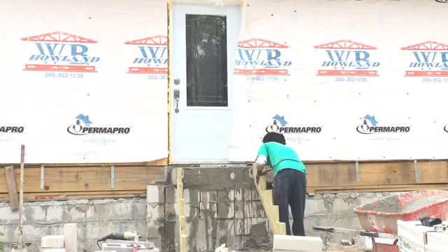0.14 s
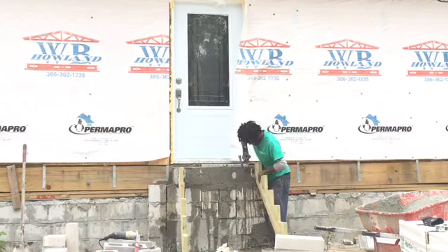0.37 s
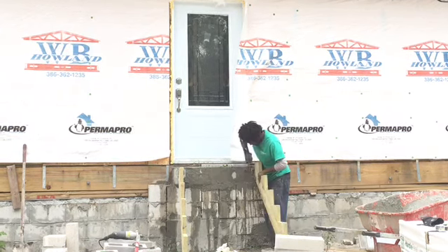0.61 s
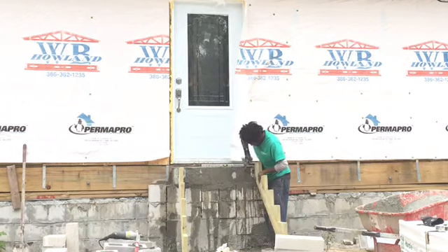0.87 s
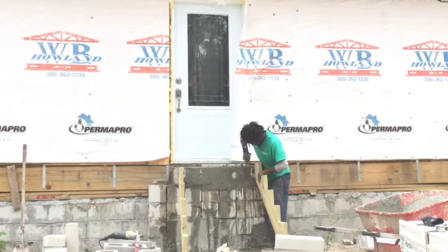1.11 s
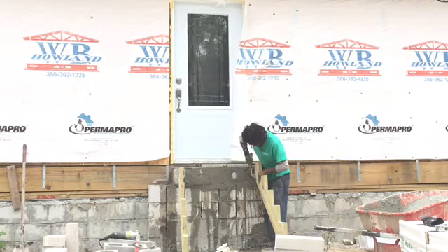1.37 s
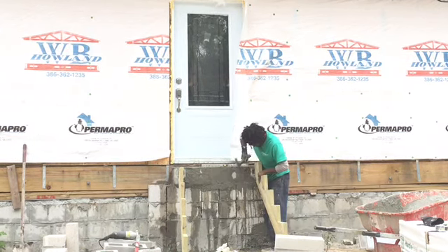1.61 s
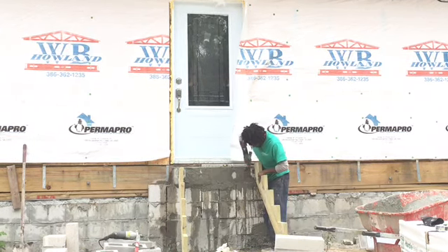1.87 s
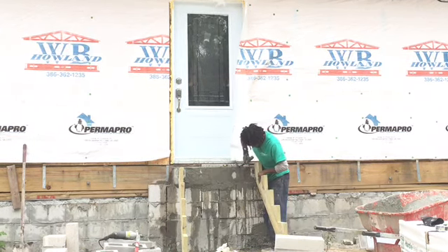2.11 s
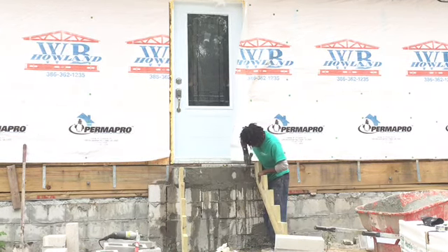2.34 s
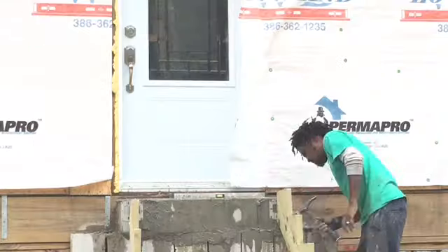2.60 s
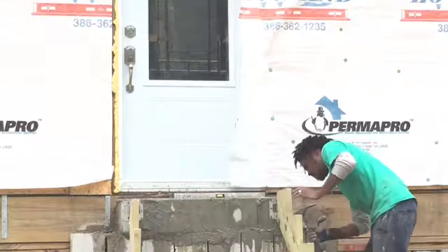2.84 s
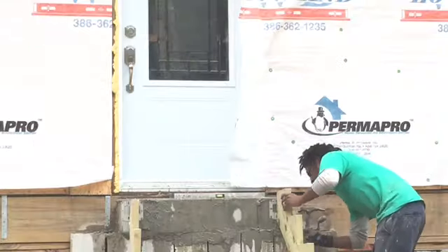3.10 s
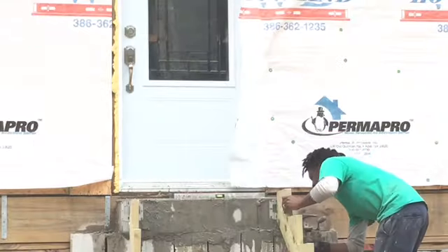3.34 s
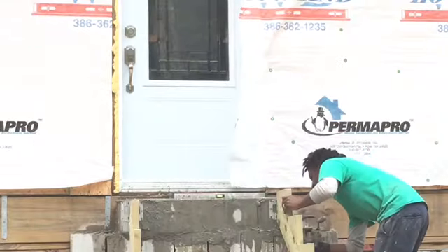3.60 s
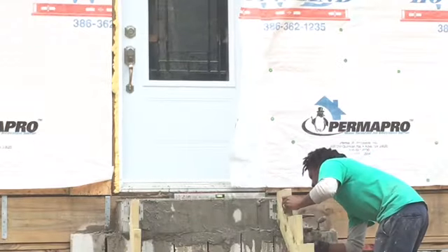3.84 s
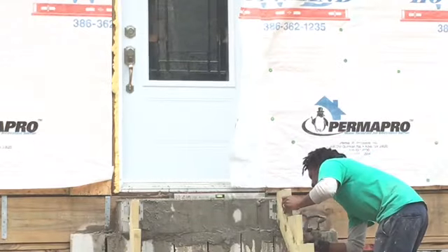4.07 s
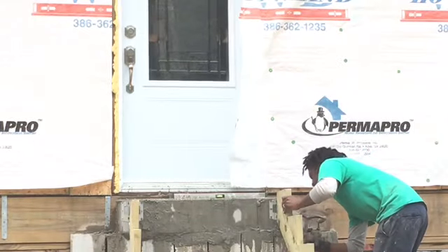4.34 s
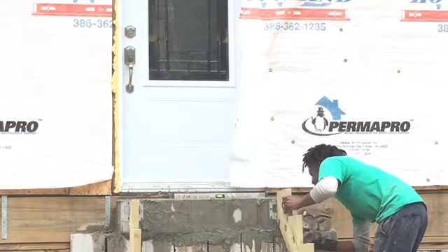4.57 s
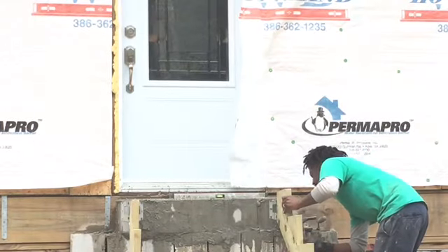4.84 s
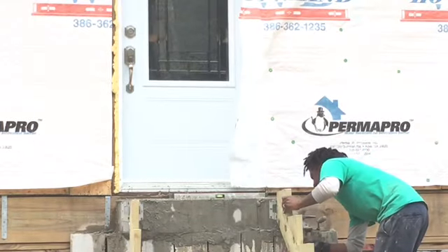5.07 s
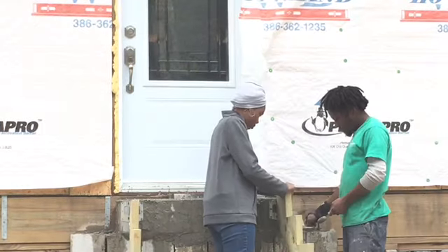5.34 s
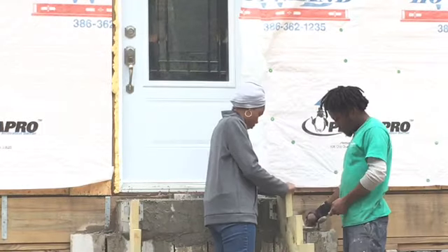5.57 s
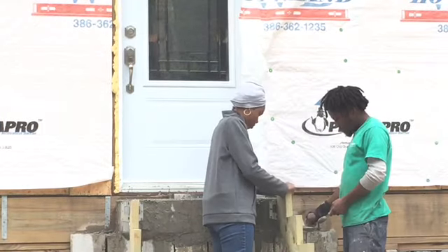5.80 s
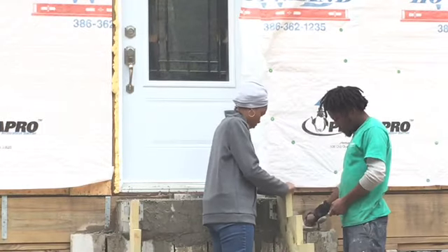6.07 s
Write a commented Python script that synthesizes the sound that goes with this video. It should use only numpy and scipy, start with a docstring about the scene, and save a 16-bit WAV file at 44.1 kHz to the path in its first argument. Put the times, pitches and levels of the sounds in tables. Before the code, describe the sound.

Outdoors at a building site, a hammer drives nails into a wooden stair board some metres from the microphone. Sharp cracks with woody knocks and thin nail rings come about every half second or less, each with quick wall echoes and a soft distant wash. After a pause, a faster run sounds louder and more hollow, with tiny tool ticks, a soft low bump and faint rustle. It stops, leaving low traffic hum.

```python
"""A hammer drives nails into a wooden stair stringer beside a house wall, heard from some metres off outdoors.
From the start each blow is a noisy crack, a short nail ring and a set of board modes; ground, wall and
stacks throw sharp echoes, and far buildings and trees a soft late wash. Shaped noise hums below as traffic.
The scene changes three times, with a fade out and in. After the second change the blows sound different,
tools tick in noise puffs, one low bump rings and a faint treble rustle grows until the last change."""
import sys
import numpy as np
from scipy import signal
from scipy.fft import rfft, irfft
from scipy.io import wavfile

SR = 44100
rng = np.random.default_rng(int(sys.argv[2]) if len(sys.argv) > 2 else 0)


def waveform_to_disk(signal):
    """Save audio, clipped to [-1, 1], as 16-bit WAV at the path in sys.argv[1]."""
    frames = np.transpose(np.atleast_2d(signal))
    scaled = np.clip(frames, -1, 1) * 32767
    samples = np.round(scaled).astype(np.int16)
    wavfile.write(sys.argv[1], SR, samples)


def linear_from_db(decibels):
    """Turn decibels (scalar or array-like) into linear amplitude factors; 0 gives 1."""
    return 10 ** (np.asarray(decibels, float) / 20)


N = 272971   # length of the sound [samples]
TAIL = int(0.6 * SR)   # longest echo [samples]

# changes of scene: (earlier echoes end [s], fade out starts [s], silence [s], fade in ends [s])
SCENE_CHANGES = [(.44, .455, .498, .535), (2.765, 2.73, 2.765, 2.81), (5.339, 5.365, 5.402, 5.43)]


def ring(push, hz, t60):
    """A resonance: a unit click sets off a sine of height 1 that falls 60 dB in t60 seconds."""
    radius = linear_from_db(-60 / (t60 * SR))
    turn = 2 * np.pi * hz / SR   # angle per sample
    # the tiny offset keeps the filter away from extremely small numbers
    return signal.lfilter([0, np.sin(turn)], [1, -2 * radius * np.cos(turn), radius ** 2], push + 1e-18)


def blow(board_db, crack_db, nail_hz, nail_db, second, lead_s):
    """One strike sets crack, nail and board sounding; the hard contact comes lead_s after the start."""
    # board modes: (pitch [Hz], time to fall 60 dB [s],
    #               level over the board level at the first spot [dB], the same at the second spot [dB])
    board_modes = [(60.7, 0.35, -9, -18), (130.8, 0.23, -11, -14), (221.1, 0.14, 1, -2),
                   (337.4, 0.087, 4.5, 2), (418.3, 0.07, 2, 3.5), (500.3, 0.056, 6, 3.5),
                   (551.6, 0.06, 4, 3.5), (628.3, 0.15, -2.5, -1), (693, 0.11, -1.5, -6.5),
                   (778, 0.029, 2, 6), (862, 0.078, 3.5, 2), (1039, 0.089, -2.5, 1),
                   (1235, 0.04, -0.5, 0.5), (1336, 0.081, -6.5, -1), (1537, 0.019, -1, -2),
                   (1643, 0.037, 0, -1.5), (1863, 0.0077, 2, 5), (2507, 0.01, -6.5, -45)]
    # the board yields this long before the hard contact: [first spot [s], second spot [s]]
    board_early_s = [0.00114, 0.002093]
    # loudest mode over the board level of a usual blow: [first spot [dB], second spot [dB]]
    loud_over_board_db = [-1, 8.5]
    crack_low_hz, crack_top_hz = 1200, [8350, 2990][second]
    uneven_db, detune = 2.8, 0.012   # detune is a fraction of the pitch
    loud_hz, loud_split_hz, loud_t60_s = 968, 33, 0.08
    usual_board_db = [-26, -18.5][second]
    loud_follows = 1.1   # dB per dB of board level: firmer blows favour the loudest mode

    t = np.arange(int(0.25 * SR)) / SR - lead_s
    click, push = np.zeros((2, len(t)))
    click[int(lead_s * SR)] = 1
    push[int((lead_s - board_early_s[second]) * SR)] = 1

    # faint noise rises just before the contact
    lead_noise = np.where(t < 0, linear_from_db(-27 + 2500 * t), 0) * rng.standard_normal(len(t))
    contact = click + lead_noise
    band = signal.butter(1, [crack_low_hz, crack_top_hz], "band", fs=SR, output="sos")
    out = linear_from_db(crack_db + 15) * signal.sosfilt(band, contact)
    # the gripped nail falls 60 dB within ten cycles
    out += linear_from_db(nail_db) * ring(contact, nail_hz, 10 / nail_hz)

    # mode pitches and levels vary a little by chance from blow to blow
    level_change_db = uneven_db * rng.standard_normal(len(board_modes))
    shift = detune * rng.standard_normal(len(board_modes))
    for k, (hz, t60, *spot_db) in enumerate(board_modes):
        mode_db = board_db + spot_db[second] + level_change_db[k]
        out += (-1) ** k * linear_from_db(mode_db) * ring(push, hz * (1 + shift[k]), t60)

    # the loudest mode is a close pair, pushed in opposite directions, that swells and beats
    loud_db = usual_board_db + loud_follows * (board_db - usual_board_db) + loud_over_board_db[second]
    for sign in (1, -1):
        out += sign * linear_from_db(loud_db) * ring(push, loud_hz + sign * loud_split_hz / 2, loud_t60_s)
    return out


def scatter(t):
    """Strength of scattered paths by delay: rough ground, stacks, yard, then the far wash."""
    ground_db, ground_s, ground_spread_s = -13.5, 0.0014, 0.00094   # just under the blow
    stacks_db, stacks_t60_s = -22.5, 0.096   # wall and timber stacks close by
    yard_db, yard_t60_s = -32.5, 0.21
    yard_end_s, yard_edge_s = 0.093, 0.0021   # the yard stops at its far side
    far_db, far_start_s, far_swell_s, far_t60_s = -51.5, 0.091, 0.024, 1   # far buildings and trees

    ground = linear_from_db(ground_db) * np.exp(-((t - ground_s) / ground_spread_s) ** 2)
    stacks = linear_from_db(stacks_db - 60 * t / stacks_t60_s)
    yard_gate = (1 - np.tanh((t - yard_end_s) / yard_edge_s)) / 2
    yard = linear_from_db(yard_db - 60 * t / yard_t60_s) * yard_gate
    late = np.maximum(t - far_start_s, 0)
    far = linear_from_db(far_db - 60 * late / far_t60_s) * (1 - np.exp(-late / far_swell_s))
    return np.sqrt(ground ** 2 + stacks ** 2 + yard ** 2 + far ** 2)


def site(sound):
    """Adds mirror echoes and scattered noise paths to the direct sound; longer scattered paths lose treble."""
    # echoes from rough faces: (delay [s], level on the scattered treble [dB], length of the smear [s])
    rough_echoes = [(.006, -14.5, 0.00077), (0.048, -32.5, 0.00087), (0.06, -37, .0005), (.070, -38, .0005),
                    (0.084, -38.5, 0.00037)]
    # mirror echoes from ground and wall: (delay [s], level [dB], treble cut [Hz])
    mirrors = [(.0062, -8, 14520), (0.01338, -5.5, 2574)]
    # near clutter scatters only above this pitch, for about this long
    small_things_hz, small_things_s = 1900, 0.03
    large_faces_db = -3   # the lower pitches, which come in later
    air_loss_db, air_knee_hz = 42.5, 10700   # dB lost per second of travel at the knee
    first_knock_s = 0.025   # scattered paths carry mostly the first, broad part of the knock

    t = np.arange(TAIL) / SR
    noise = rng.standard_normal(TAIL)
    treble = signal.sosfilt(signal.butter(4, small_things_hz, "high", fs=SR, output="sos"), noise)
    lows = signal.sosfilt(signal.butter(4, small_things_hz, fs=SR, output="sos"), noise)
    near = np.exp(-(t / small_things_s) ** 2)
    paths = (treble + linear_from_db(large_faces_db) * (1 - near) * lows) * scatter(t)
    for s, db, length_s in rough_echoes:
        paths += linear_from_db(db) * treble * (t >= s) * np.exp(-np.abs(t - s) / length_s)

    # air loss grows with delay and rises steeply with pitch
    hz, delay, cells = signal.stft(paths, SR, nperseg=256)
    loss_db = air_loss_db * np.outer((hz / air_knee_hz) ** 3, delay)
    paths = signal.istft(cells * linear_from_db(-loss_db), SR, nperseg=256)[1][:TAIL]

    first = sound * np.exp(-t[:len(sound)] / first_knock_s)
    out = signal.fftconvolve(first, paths)[:TAIL]
    out[:len(sound)] += sound
    for s, db, cut_hz in mirrors:
        dull = signal.lfilter(*signal.butter(1, cut_hz, fs=SR), sound)
        start = int(s * SR)
        out[start:start + len(sound)] += linear_from_db(db) * dull
    return out


def hammer():
    """Places all blows in time; a change of scene cuts off the echoes still sounding."""
    # blows: (time [s], board level [dB], crack level before a common 15 dB lift [dB],
    #         nail ring [Hz], nail ring level [dB])
    blows = [(-.115, -27.5, -9.5, 7500, -23), (0.1986, -25.5, -11.5, 7240, -13.5),
             (0.7087, -28.5, -13.5, 5200, -41), (1.1206, -26, -14, 7000, -10),
             (1.5341, -25.5, -12, 9100, -8), (1.9583, -24.5, -8.5, 11500, -13),
             (2.3845, -23, -15.5, 6400, -22), (3.4212, -26, -22, 3350, -23.5), (3.715, -21, -12, 4170, -36),
             (3.9847, -20, -7.5, 5200, -31.5), (4.2504, -20, -4, 6800, -27), (4.5126, -20, -3.5, 4570, -21),
             (4.8949, -21.5, -9, 14600, -17.5), (5.1998, -20, -6, 7000, -33.5)]
    lead_s, second_spot_s = 0.0035, 3   # later blows strike the second spot
    out = np.zeros(N + 2 * TAIL)   # with room for a blow before the start
    for s, *strength in blows:
        heard = site(blow(*strength, int(s > second_spot_s), lead_s))
        end = min([change[0] for change in SCENE_CHANGES if change[0] > s] + [s + 1])
        heard = heard[:int((end - s + lead_s) * SR)]
        start = TAIL + int((s - lead_s) * SR)
        out[start:start + len(heard)] += heard
    return out[TAIL:TAIL + N]


def rms_one(x):
    """Scales a sound to unit power."""
    return x / np.sqrt(np.mean(x ** 2) + 1e-20)


def coloured(spectrum, size):
    """Noise of unit power whose spectrum follows (Hz, dB) points along a log-frequency axis."""
    hz, db = np.transpose(spectrum)
    grid = np.maximum(np.fft.rfftfreq(size, 1 / SR), 1)
    shape = linear_from_db(np.interp(np.log(grid), np.log(hz), db))
    return rms_one(irfft(rfft(rng.standard_normal(size)) * shape, size))


def traffic():
    """Far road noise with a slightly lumpy bass, plus two engine drones made by narrow noise resonances."""
    # shape of the road noise: (pitch [Hz], relative level per Hz [dB])
    road_spectrum = [(15, -34.5), (25, -11.5), (114, -1.5), (142, -20.5), (187, -4), (252, -28.5),
                     (433, -18), (483, -24), (878, -21.5), (952, -25), (1390, -24.5), (2600, -32),
                     (9080, -42.5), (15200, -54.5), (16500, -55)]
    # engine drones: (pitch [Hz], width [Hz], rms level [dB])
    drones = [(107.8, 61, -60), (217.8, 25, -64)]
    # road noise level before, between and after the changes of scene: one level [dB] for each
    shot_db = [-50, -51.5, -51.5, -52]
    lumpy_db = 0.7

    out = coloured(road_spectrum, N)
    slow = signal.butter(2, 8, fs=SR, output="sos")
    lumps = rms_one(signal.sosfilt(slow, rng.standard_normal(N)))
    bass = signal.sosfilt(signal.butter(1, 250, fs=SR, output="sos"), out)
    out = out + bass * (linear_from_db(lumpy_db * lumps) - 1)
    silences = [silent_s for _, _, silent_s, _ in SCENE_CHANGES]
    shot = np.searchsorted(silences, np.arange(N) / SR)
    out = out * linear_from_db(np.array(shot_db)[shot])
    for hz, width_hz, db in drones:
        out += linear_from_db(db) * rms_one(ring(rng.standard_normal(N), hz, 1.3 / width_hz))
    return out


def ticks():
    """Small ticks of tools: short noise puffs, a few octaves wide, that die away."""
    # ticks: (time [s], level before the decay [dB], pitch near the top of the band [Hz],
    #         time to fall 60 dB [s])
    tick_list = [(3.188, -53, 4560, 0.0085), (3.323, -51, 600, .03), (3.605, -57, 12000, 0.023),
                 (4.432, -51, 11000, .008), (4.863, -52, 11000, 0.0091), (5.098, -45, 6060, 0.0071),
                 (5.323, -45, 1200, 0.034)]
    out = np.zeros(N)
    t = np.arange(TAIL // 4) / SR
    for s, db, hz, t60 in tick_list:
        band = signal.butter(1, [hz * 0.18, min(hz * 0.97, 20000)], "band", fs=SR, output="sos")
        puff = rms_one(signal.sosfilt(band, rng.standard_normal(len(t))))
        start = int(s * SR)
        out[start:start + len(t)] += puff * linear_from_db(db - 60 * t / t60)
    return out


def bump():
    """Something soft is set down: one click rings a few low cycles that die fast."""
    # the bump: (time [s], level before the decay [dB], pitch [Hz], time to fall 60 dB [s])
    soft_bump = (3.324, -33, 170, .07)
    s, db, hz, t60 = soft_bump
    click = np.zeros(N)
    click[int(s * SR)] = 1
    return linear_from_db(db) * ring(click, hz, t60)


def rustle():
    """Faint treble noise, perhaps clothing, slightly uneven by chance and growing until it stops."""
    # treble band: [low edge [Hz], high edge [Hz]]
    rustle_hz = [5000, 11000]
    start_s, end_s = 3.6, 5.339
    start_db, growth_db, uneven_db = -79.5, 15, 0.5
    t = np.arange(N) / SR
    band = signal.butter(1, rustle_hz, "band", fs=SR, output="sos")
    hiss = rms_one(signal.sosfilt(band, rng.standard_normal(N)))
    slow = signal.butter(2, 10, fs=SR, output="sos")
    uneven = rms_one(signal.sosfilt(slow, rng.standard_normal(N)))
    rise_db = np.interp(t, [start_s, end_s], [0, growth_db])
    level = linear_from_db(start_db + rise_db + uneven_db * uneven)
    return hiss * level * (t > start_s) * (t < end_s)


def scene():
    """Adds up hammer, ticks, soft bump, traffic and rustle as one channel."""
    return (hammer() + ticks() + bump() + traffic() + rustle())[None]


def band_limit(x):
    """A steep low-pass at the top of the band."""
    return signal.sosfilt(signal.butter(12, 16970, fs=SR, output="sos"), x)


def record(dry):
    """The microphone cuts the bass, changes of scene fade, peaks are rounded and the top treble is cut."""
    mic_low_hz, treble_cut_hz = 39.7, 17200
    t = np.arange(N) / SR
    gain = 1
    for _, out_s, silent_s, in_s in SCENE_CHANGES:
        gain = gain * np.interp(t, [out_s, silent_s, in_s], [1, 0, 1]) ** 0.91   # slightly curved fades
    x = signal.sosfilt(signal.butter(2, mic_low_hz, "high", fs=SR, output="sos"), dry)
    x = np.tanh(x * gain)
    x = signal.sosfilt(signal.cheby2(8, 50, treble_cut_hz, fs=SR, output="sos"), x)
    return band_limit(x)


dry = scene()
out = record(dry)
waveform_to_disk(out)
```